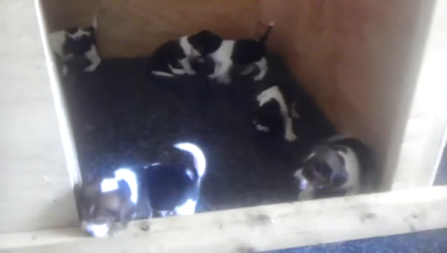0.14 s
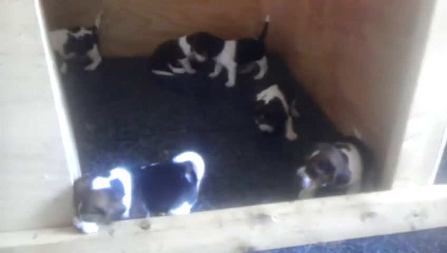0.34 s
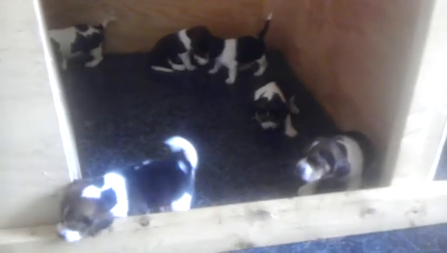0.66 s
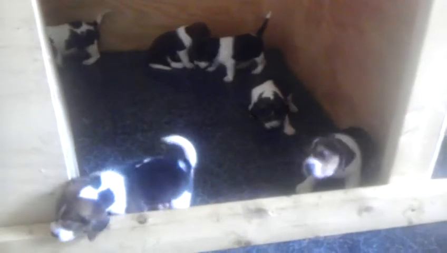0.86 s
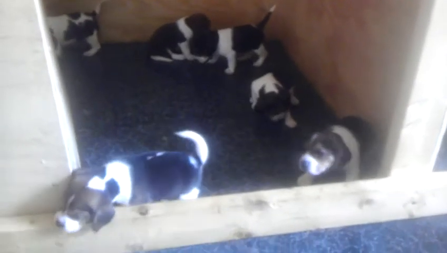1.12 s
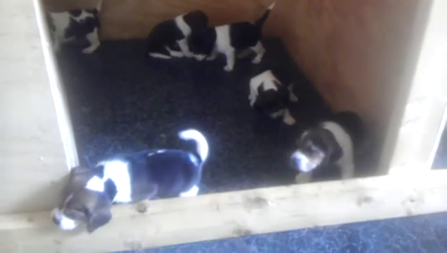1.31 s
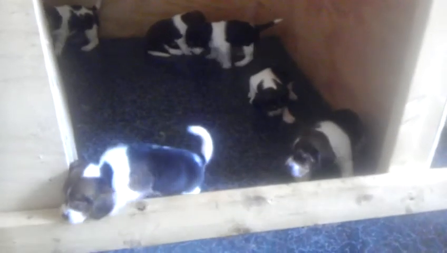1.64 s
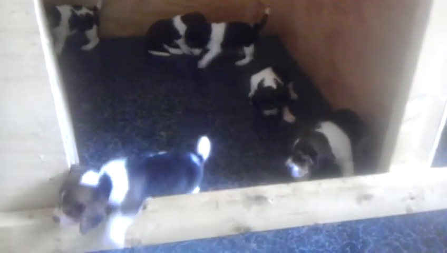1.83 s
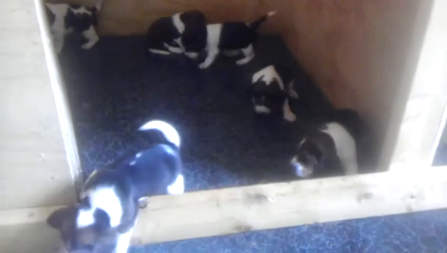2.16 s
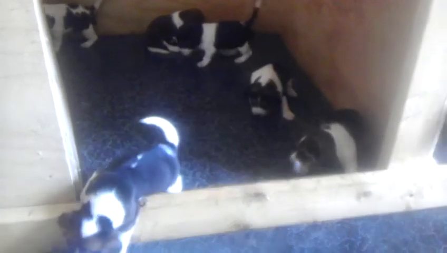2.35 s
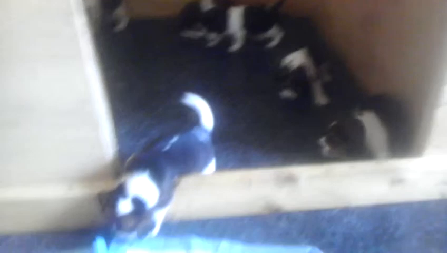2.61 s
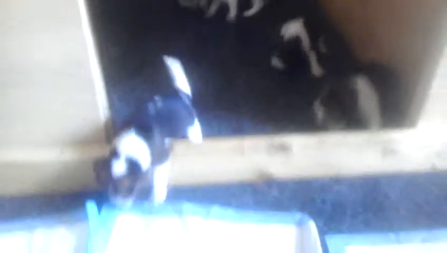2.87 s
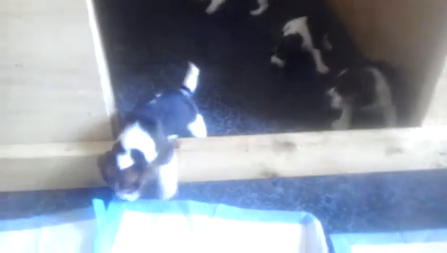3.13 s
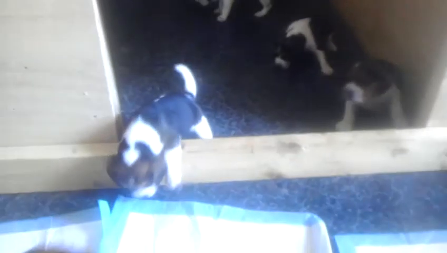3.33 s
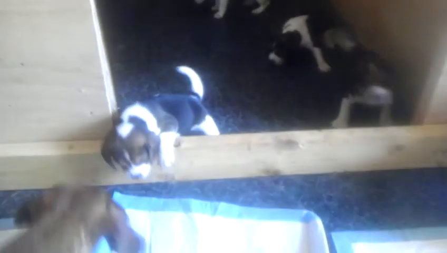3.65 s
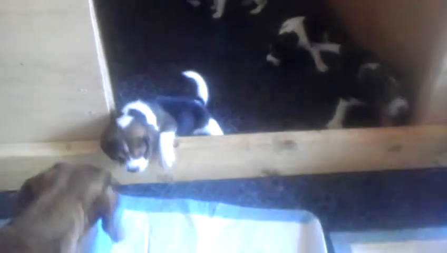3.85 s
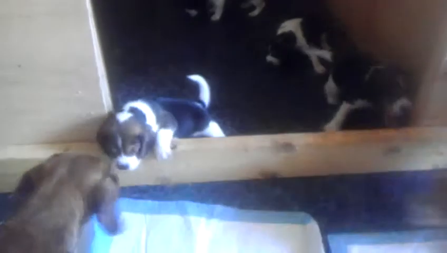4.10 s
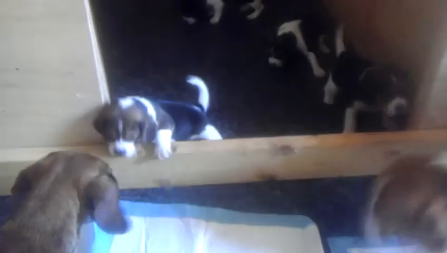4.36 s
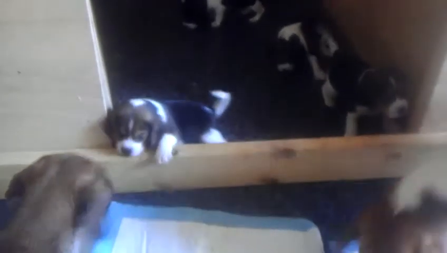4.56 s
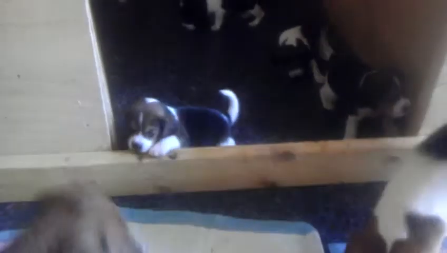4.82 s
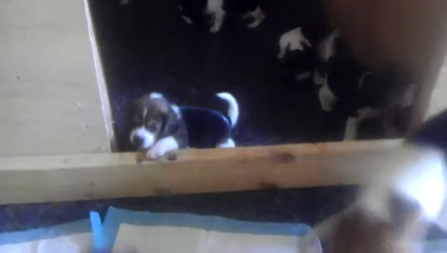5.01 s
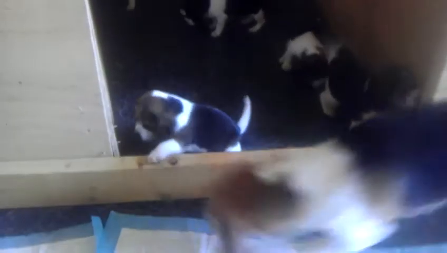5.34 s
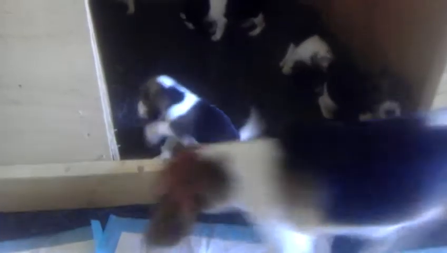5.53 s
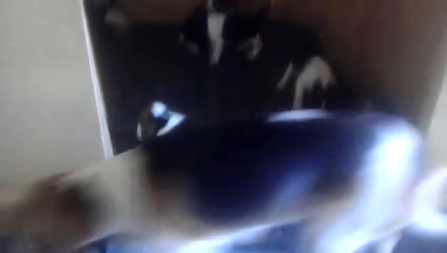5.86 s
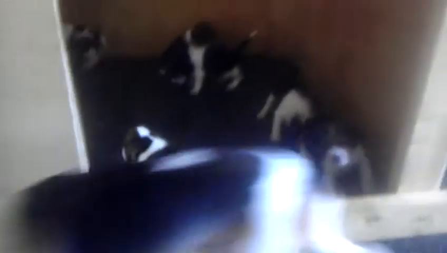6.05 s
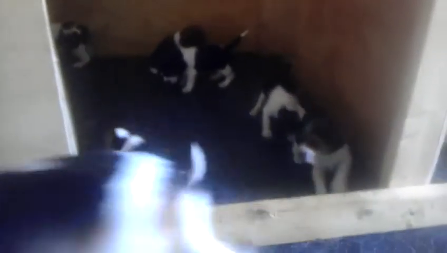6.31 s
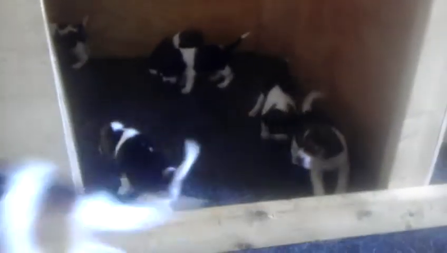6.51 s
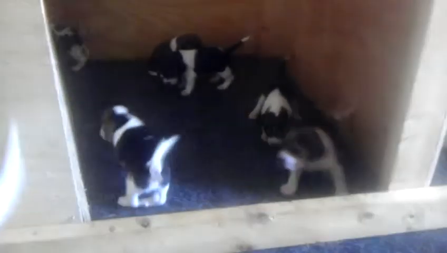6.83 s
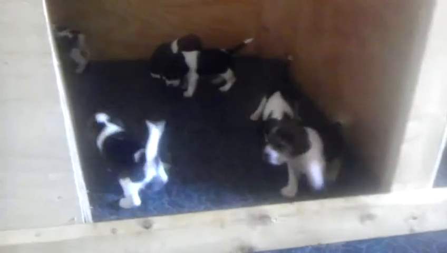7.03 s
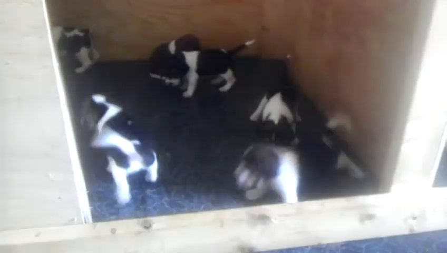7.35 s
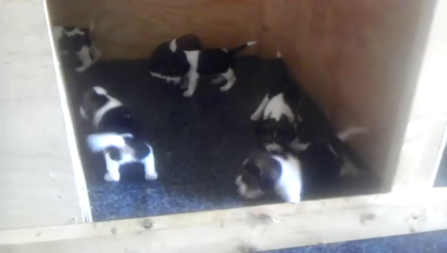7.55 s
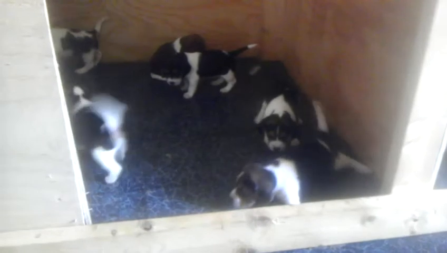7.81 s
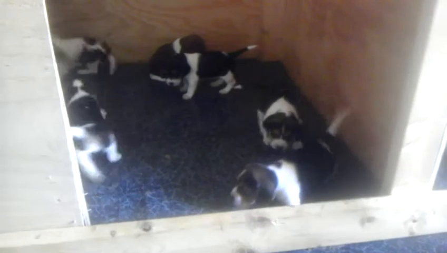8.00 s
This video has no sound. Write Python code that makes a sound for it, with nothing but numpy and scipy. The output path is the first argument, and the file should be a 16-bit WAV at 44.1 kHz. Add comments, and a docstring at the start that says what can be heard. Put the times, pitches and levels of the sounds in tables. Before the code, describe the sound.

Close indoor pickup with thin bass and light hiss: clear, brief puppy whimpers come first, over shuffling feet and dry claw ticks on boards. After a short snort of air comes a quieter gap with a very faint high whistle, then woody paw thuds, crisp clicks and rustling as dogs move about. A rough stick-slip scrape with a low hum cuts in last. The room adds a short boxy ring.

```python
"""Plywood pen in a small room: puppies whine and grunt, paws thump the boards, claws click and scratch. Whines
are gliding partials, grunts a fundamental with two overtones plus puffed noise, a grown dog's whistle a
jittered sine. Paws ring decaying board modes; claws, scuffs, brushes, shuffles and the dog's snort are shaped
noise. At the end a board scrapes harshly: stick-slip noise through resonances. A faint hiss lies underneath."""
import sys
import numpy as np
from scipy import signal
from scipy.fft import rfft, irfft, next_fast_len
from scipy.io import wavfile
from scipy.ndimage import map_coordinates

SR = 44100
rng = np.random.default_rng(int(sys.argv[2]) if len(sys.argv) > 2 else 0)


def waveform_to_disk(signal):
    """Save audio, clipped to [-1, 1], as 16-bit WAV at the path in sys.argv[1]."""
    frames = np.transpose(np.atleast_2d(signal))
    scaled = np.clip(frames, -1, 1) * 32767
    samples = np.round(scaled).astype(np.int16)
    wavfile.write(sys.argv[1], SR, samples)


N = 360297  # samples

# puppy whines: start_s, length_s, start_pitch_hz, held_pitch_hz, end_pitch_hz, hold_place_0_1,
# linger_exponent, fundamental_gain_db, peak_place_0_1, swell_db, fade_db, octave_gain_db, octave_swell_db,
# nasal_ring_gain_db, shrillness_db, roughness_0_1, left_minus_right_db
WHINES = [ (0.0, 0.17, 1118, 1037, 980, 0.6, 3.04, -27, 0.89, 11.4, 0.78, -38, 15, -28, -3.5, 0.048, 1),
          (0.33, 0.18, 989.7, 960, 954, 0.65, 5.6, -26.5, 0.77, 12.7, 4.3, -34, 15.5, -40.5, 3.5, 0.13, -1.5),
          (0.68, 0.039, 938, 935, 926, 0.44, 1.8, -31, 0.83, 14, 1, -36.5, -15, -46.5, 6, 0.32, -2),
          (0.868, 0.038, 923, 934, 930.4, 0.38, 2, -28, 0.96, 21, 1, -36, -16, -46, 9.5, 0.08, 1),
          (1.455, 0.031, 730, 808, 740, 0.63, 1.7, -23.5, 0.82, 23, 2, -45, -7, -58.5, -5, 0.53, -3),
          (1.709, 0.059, 743, 805.5, 800, 0.65, 2.1, -20.5, 0.98, 4.3, 3.3, -41.5, 9, -50.5, -15, 0.26, -4.5),
          (1.923, 0.11, 769, 961.5, 886, 0.57, 2.07, -25, 0.13, 7.7, 6.4, -38, 6.5, -44.5, -15, 0.24, -2.5),
          (2.19, 0.11, 783.5, 959, 835, 0.65, 4.73, -23, 0.083, 4.2, 1.3, -38, 11, -42, -26, 0.054, -2),
          (2.472, 0.18, 945, 1058, 881, 0.38, 1.24, -22, 0.55, 13, 14, -45, 0, -39.5, -4, 0.02, -1.5),
          (2.824, 0.177, 972, 1001, 1008, 0.39, 1.6, -24.5, 0.4, 13.5, 5.3, -44.5, 6, -46.5, 6, 0.11, 4),
          (3.192, 0.0485, 972, 945, 970, 0.5, 1.6, -38, 0.18, 2, 17, -39, 6, -49, 2, 0.2, -5),
          (3.243, 0.052, 963, 972, 922, 0.55, 2, -32.5, 0.36, 6, 8.1, -36.5, 9, -46.5, 6, 0.25, -7.5),
          (3.449, 0.058, 755.4, 771.4, 815, 0.77, 3.4, -30.5, 0.4, 6.2, 1.6, -35.5, 22, -46.5, 12.5, 0.13, 5.5),
          (3.499, 0.041, 828, 890, 786, 0.41, 2, -29, 0.49, 4.9, 5.8, -44.5, -2, -51, 16, 0.26, -6),
          (3.764, 0.077, 960, 1167, 1180, 0.98, 1.3, -26.5, 0.78, 7, 8.8, -43, -19, -46.5, 10, 0.34, -0.5),
          (4.006, 0.073, 1196, 1348, 1356, 0.97, 2.93, -28.5, 0.41, 6, 6.2, -56.5, -6, -50.5, 15.5, 0.19, 5.5),
          (4.227, 0.1, 991, 1058, 947, 0.53, 3.1, -23.5, 0.92, 6.7, 1.4, -33, 2, -46, 16.5, 0.16, 3),
          (7.474, 0.025, 1160, 1020, 960, 0.6, 1.5, -52, 0.5, 4, 3, -66, -1, -71, 0, 0.3, 0)]
# muzzle colour on the upper partials: frequency_hz, relative_level_db
MUZZLE = [(2300, -12.5), (3200, -14.5), (3900, -13), (4200, 4.5), (4650, 6), (5250, 12), (5900, -3.5),
          (6800, -19.5), (8600, -16), (10500, -28.5), (12200, -23.5), (14000, -61.5)]
# pen standing waves: centre_hz, width_hz, level_db
PEN_WAVES = [(786, 12, 3), (925, 16, -1), (1046, 14, -5)]
# shuffling bouts: start_s, length_s, relative_tread_db, relative_rub_db
SHUFFLES = [(0.0, 0.39, -55, -52.5), (0.355, 0.4, -58.5, -64.5), (0.753, 0.27, -58.5, -66.5),
            (1.112, 0.69, -69, -64), (1.728, 0.52, -62, -73.5), (2.255, 0.55, -62, -61.5),
            (2.821, 0.3, -55, -57), (3.126, 0.54, -59.5, -60), (3.74, 0.2, -57, -55),
            (3.994, 0.45, -55.5, -57), (4.863, 0.51, -73.5, -71.5), (5.348, 0.4, -65, -59.5),
            (5.83, 0.2, -66, -62.5), (6.086, 0.31, -65, -61.5), (6.443, 0.17, -67, -64),
            (6.651, 0.25, -68, -65.5), (6.946, 0.18, -58.5, -57.5), (7.224, 0.22, -62, -53),
            (7.477, 0.41, -52, -54), (7.861, 0.27, -64, -55.5)]
# litter stirring between bouts: time_s, relative_level_db
STIRRING = [(0.0, -62), (3.5, -58), (3.7, -75.5), (8.17, -72)]
# claws dragged over plywood: start_s, length_s, level_db
SCRATCHES = [(0.112, 0.07, -42), (1.153, 0.058, -44), (1.679, 0.034, -35), (2.59, 0.031, -39),
             (2.68, 0.032, -43), (2.97, 0.075, -34), (3.29, 0.037, -41.5), (5.39, 0.3, -57.5),
             (6.158, 0.059, -53), (6.81, 0.043, -52), (7.332, 0.041, -53), (7.765, 0.042, -54),
             (7.905, 0.066, -44.5), (8.014, 0.067, -47.5)]
# paws on the boards: start_s, gain_db, relative_scuff_db
PAWS = [(0.199, -38.5, 12), (0.224, -33, -1.5), (0.868, -33, -1), (1.346, -32.5, -16), (1.496, -39, 1),
        (2.29, -35, 0), (2.415, -36.5, -12), (3.058, -38, 7.5), (3.774, -37, -9), (3.819, -40.5, -20),
        (4.071, -39.5, -18), (4.862, -46, -18), (5.827, -30, -6), (6.282, -38, -12), (6.423, -35.5, -9),
        (6.844, -42.5, -15), (6.94, -38.5, -11), (7.041, -51, -16), (7.269, -32.5, -8), (7.329, -41, -16),
        (7.528, -32.5, -5.5), (7.553, -46, -18), (7.629, -40, -29), (7.675, -34, -4), (7.856, -35.5, -25),
        (7.956, -39, -22), (8.025, -48, -24)]
# board modes: nominal_frequency_hz, relative_level_db, t60_s
BOARDS = [(86.4, -49.5, 0.13), (135.6, -5, 0.13), (167, 1.5, 0.085), (216.2, -1, 0.21), (234.4, -1, 0.15),
          (315.6, -8, 0.22), (413.4, -4, 0.11), (565, -17, 0.11), (718, -16, 0.033), (986, 0.5, 0.023)]
# claw clicks: start_s, gain_db, relative_woody_body_db, relative_tick_db, relative_crack_db
CLAWS = [(0.842, -39, -1, -16, -8), (1.083, -46.5, -16, -7, 10), (1.293, -40, -23, -12, 6.5),
         (1.514, -45, -28, -12, 1), (1.8376, -41, 1, -12, -7), (2.6852, -32.5, -22, -7, 7.5),
         (2.9721, -27.5, -18, -25, 0), (3.1537, -37.5, -20, -7, 7), (3.4416, -32, -20, -10, -1),
         (4.1845, -38, -13, -7, -3), (5.656, -49.5, 0, -24, -4), (5.8072, -45, 5, -22, -4),
         (5.828, -37, -3, -15, -16), (5.838, -35.5, -3.5, -14, -2), (5.9716, -43, -10, -13, 0),
         (6.104, -53, 2, -20, -4), (6.263, -40, -8, -20, -6), (6.274, -32.5, -14, -20, -14),
         (6.4096, -48.5, 5, -25, -7), (6.4213, -30.5, -4.5, -16, 1.5), (6.929, -37.5, -5, -12, -8),
         (7.006, -50, -1, -14, -4), (7.0324, -23.5, -13, -10.5, -6.5), (7.2485, -27, -8, -24, 10),
         (7.2541, -30.5, 7, -3, -6.5), (7.3279, -34, -15, -4, 1), (7.345, -36.5, -8, -18, 0),
         (7.5107, -52, 1, 3, -6), (7.654, -44, -6, -2, 1), (7.977, -47, 1, -11, 0),
         (8.017, -44, -5, -12, -3)]
# closed-mouth grunts: start_s, length_s, mean_pitch_hz, relative_level_db, overtone_step_db, hoarseness_0_1
GRUNTS = [(1.241, 0.03, 378, -42, -15, 0.01), (1.34, 0.021, 330, -38.5, -28, 0.14),
          (1.444, 0.028, 417, -40.5, -17, 0.1), (3.347, 0.056, 408, -43, -2.5, 0.27),
          (7.623, 0.026, 394, -39.5, -19, 0), (7.767, 0.048, 433, -49, 3, 0.04)]
# flank or paw brushing the mat: start_s, length_s, level_db
BRUSHES = [(2.365, 0.082, -44.5), (3.04, 0.035, -41), (3.338, 0.05, -48.5), (4.869, 0.051, -53.5),
           (5.079, 0.078, -52), (5.22, 0.046, -51.5), (6.154, 0.049, -54), (7.754, 0.062, -42.5)]
# grown dog's whistle: time_s, pitch_hz, level_db
WHISTLE = [(5.356, 4190, -71), (5.41, 4150, -65), (5.43, 4080, -58), (5.47, 4100, -54), (5.502, 4163, -54),
           (5.55, 4086, -50.5), (5.58, 4072, -52), (5.605, 4100, -66)]
# scraping board resonances: centre_hz, width_hz, relative_level_db
SCRAPE_BODY = [(390, 180, -18), (905, 97, -10.5), (1240, 470, -20.5), (1640, 185, -10), (1884, 180, -10),
               (2780, 700, -23.5), (6800, 540, -35.5)]
# noise colours, each: frequency_hz, relative_level_db_per_hz
# tread and rub of the feet
TREAD_COLOUR = [(18, -72), (30, -66), (64, -17.5), (156, -5), (211, 2), (261, -3), (339, -6), (402, -3),
                (459, -10), (552, -19), (700, -17.5), (910, -50), (1540, -120)]
RUB_COLOUR = [(290, -45), (500, -10), (689, -12), (886, -7.5), (1150, -6.5), (1240, -8.5), (1310, -10),
              (3060, -7.5), (4920, -16), (6500, -22), (14000, -23)]
# steady hiss
HISS_COLOUR = [(15, -20), (25, -4), (54, -18), (231, 6), (286, -3), (414, 2), (684, -3.5), (991, -5.5),
               (1600, -6), (2860, -5.5), (6330, -19.5), (11600, -9), (14000, -9)]
# dragged claw
SCRATCH_COLOUR = [(200, -14), (900, -29), (1800, 0), (2900, 4.5), (4200, -2), (6000, -9.5), (9000, -17),
                  (14000, -39)]
# paw scuff
SCUFF_COLOUR = [(40, -57), (150, -23), (350, 7.5), (600, 3.5), (1100, 3), (1600, -9), (4000, -75)]
# claw strike: woody body, click, crack, tick
CLAW_BODY = [(50, -57), (220, -1), (600, -15.5), (1100, -9.5), (1600, -4), (2400, 0.5), (4000, -29)]
CLAW_CLICK = [(100, -62), (900, -10), (1800, -4), (2700, 3), (4000, -9.5), (5200, -12.5), (6500, -28),
              (10000, -47)]
CLAW_CRACK = [(60, -62), (500, -43), (1500, -38), (3000, 7), (4200, 6.5), (5200, -3.5), (8000, -50),
              (14000, -53)]
CLAW_TICK = [(300, -64), (3500, 4), (6000, 4), (8300, 3), (11000, -7.5), (14000, -19)]
# air in a grunt
GRUNT_AIR = [(90, -34), (200, -6), (400, 4.5), (650, -2), (950, -6), (1200, -7), (1600, -26), (4000, -52)]
# brushed fibres
BRUSH_COLOUR = [(40, -66), (120, -5), (220, -24.5), (420, -1), (650, -15), (1100, -2), (1500, -9),
                (3200, -9), (6000, -19.5), (14000, -30)]
# snorted air
SNORT_AIR = [(59, -88), (100, -54), (254, -11), (791, -8.5), (859, -3), (1150, -10), (1350, -20),
             (2410, -18.5), (4400, -42), (6790, -59), (7220, -71), (12900, -61), (14000, -65)]
# stereo likeness of noise: frequency_hz, left_right_likeness_0_1
ALIKE = [(60, 0.48), (150, 0.91), (370, 0.8), (910, 0.7), (2250, 0.18), (5560, 0.13), (13800, 0.068)]
# room decay: frequency_hz, t60_s
ROOM = [(150, 0.39), (900, 0.27), (2500, 0.18), (5500, 0.23), (12000, 0.081)]

SNORT_S, SCRAPE_S = 4.575, 8.093


def amp(db):
    """Decibels to gain."""
    return 10 ** (np.asarray(db) / 20)


def unit(x):
    """Scale to rms 1."""
    return x / np.sqrt(np.mean(x ** 2) + 1e-20)


def along(points, hz):
    """(Hz, value) points read on a log axis."""
    f, v = np.transpose(points)
    return np.interp(np.log(hz + 1), np.log(f + 1), v)


def curves(rows, t):
    """Each column after the time, read at the times t."""
    s, *cols = np.transpose(rows)
    return [np.interp(t, s, c) for c in cols]


def seconds(length_s):
    """Sample times from zero."""
    return np.arange(0, length_s, 1 / SR)


def gate(t, edge_s):
    """Soft opening and closing."""
    to_edge_s = np.minimum(t - t[0], t[-1] - t)
    return np.sin(np.pi / 2 * np.clip(to_edge_s / edge_s, 0, 1)) ** 2


def wobble(n, rate_hz):
    """A smooth random curve, rate_hz knots a second."""
    knots = rng.standard_normal(int(n * rate_hz / SR) + 4)
    return map_coordinates(knots, [np.arange(n) * rate_hz / SR])


def add(track, s, x):
    """Mix x into the track at time s."""
    i = max(0, round(s * SR))
    track[..., i:i + x.shape[-1]] += x[..., :max(0, N - i)]


def filtered(x, response):
    """x times a response of frequency."""
    n = x.shape[-1]
    m = next_fast_len(n + SR // 8)
    return irfft(rfft(x, m) * response(np.fft.rfftfreq(m, 1 / SR)), m)[..., :n]


def resonance(f, centre_hz, width_hz, db):
    """Response of one damped mode, peaking at db."""
    damping = 1j * f * width_hz
    return amp(db) * damping / (centre_hz * centre_hz - f * f + damping)


def noise(colour, n):
    """Coloured stereo noise of rms 1, its left-right likeness set by ALIKE."""
    def mid_side(hz):
        turn = np.arccos(np.clip(along(ALIKE, hz), -1, 1)) / 2
        return amp(along(colour, hz)) * [np.cos(turn), np.sin(turn)]

    mid, side = filtered(rng.standard_normal((2, n)), mid_side)
    return unit(np.array([mid + side, mid - side]))


def panned(lean_db):
    """Left and right gains lean_db apart."""
    return amp(np.array([lean_db, -lean_db]).reshape(2, -1) / 2)


def in_room(x, wet_db, first_wall_s=.004):
    """Direct sound plus a fresh decaying tail from pen walls and room; total energy is kept."""
    hz, t, z = signal.stft(noise([(1, 0)], SR // 2), SR, nperseg=256)
    decay = amp(-60 * t / along(ROOM, hz)[:, None])
    tail = signal.istft(z * decay, SR, nperseg=256)[1]
    tail = tail * (np.arange(tail.shape[1]) / SR > first_wall_s)
    response = amp(wet_db) * tail / np.linalg.norm(tail[0])
    response[:, 0] = 1  # direct sound
    heard = signal.fftconvolve(np.atleast_2d(x), response, axes=1)
    return heard * np.linalg.norm(x, axis=-1, keepdims=True) / np.linalg.norm(heard, axis=1, keepdims=True)


def in_pen(x):
    """Whines set the pen's standing waves ringing; these beat against the voice when the pitch moves on."""
    waves = lambda f: 1 + sum(resonance(f, *wave) for wave in PEN_WAVES)
    rung = filtered(np.pad(x, (0, SR // 4)), waves)
    return rung * np.linalg.norm(x) / np.linalg.norm(rung)


def whine_pitch(t, length, start_hz, held_hz, end_hz, hold_at, linger):
    """Fold pitch slides to a held note, then to its end; a falling whine slackens at the last."""
    fall_shape, slack_share, slack_s = 1.9, 0.088, 0.0076
    u, hold_at = t / length, np.clip(hold_at, .02, .98)
    rise = np.sin(np.pi / 2 * np.minimum(u / hold_at, 1)) ** linger
    fall = np.maximum((u - hold_at) / (1 - hold_at), 0) ** fall_shape
    hz = start_hz + (held_hz - start_hz) * rise + (end_hz - held_hz) * fall
    slack = slack_share * (end_hz < held_hz) * np.exp((t - length) / slack_s)
    return hz * (1 - slack)


def whines(jitter=0.041, shimmer_db=6, edge_s=0.0033, attack_s=0.007, shrill_hz=6500, ring_lean_db=4.0):
    """Tight vocal folds give a strong fundamental, its octave and upper partials ringing in the muzzle."""
    end_rough = 0.12  # roughness gained as the air runs out
    octave_open_db, ring_open_db = 5.5, 8  # what the opening mouth adds
    low_waver_db, low_waver_hz, waver_db, waver_hz = 2.2, 55, 3, 48.5  # fundamental, then other partials
    out, k = np.zeros((2, N)), np.arange(1, 18)[:, None]
    for (s, length, start_hz, held_hz, end_hz, hold_at, linger, low_db, peak_at, swell_db, fade_db,
         octave_db, octave_swell_db, ring_db, shrill_db, rough, lean_db) in WHINES:
        t = seconds(length)
        n, u = len(t), t / length
        hz = whine_pitch(t, length, start_hz, held_hz, end_hz, hold_at, linger)
        shut = 1 - np.sin(np.pi * u)
        effort_db = np.interp(u, [0, np.clip(peak_at, 0, 1), 1], [-swell_db, 0, -fade_db])
        effort = amp(effort_db) * (1 - np.exp(-t / attack_s))
        # hoarse folds waver in pitch and strength
        rough = rough + end_rough * u ** 6
        hz = hz * (1 + jitter * rough * wobble(n, 257.0))
        push = gate(t, edge_s) * amp(shimmer_db * rough * wobble(n, 296.3))
        # each partial wavers on its own
        waver = np.array([unit(amp(waver_db * wobble(n, waver_hz))) for _ in k])
        waver[0] = unit(amp(low_waver_db * wobble(n, low_waver_hz)))
        partials = np.sqrt(2) * push * waver * np.sin(2 * np.pi * k * np.cumsum(hz) / SR)
        # shrillness shifts the partials above shrill_hz
        muzzle = amp(along(MUZZLE, k * hz) + shrill_db * (k * hz > shrill_hz)) * (k > 2)
        upper = (muzzle * partials).sum(0) / np.linalg.norm(muzzle, axis=0)
        low = amp(low_db) * in_pen(effort * partials[0]) * panned(lean_db)
        octave = amp(octave_db + octave_swell_db * (u - .5) - octave_open_db * shut) * partials[1]
        ring = amp(ring_db - ring_open_db * shut) * upper * panned(ring_lean_db)
        add(out, s, in_room(low, wet_db=-5))
        add(out, s, in_room(octave, wet_db=-3.0))
        # high partials beam forward and reach fewer walls
        add(out, s, in_room(ring, wet_db=-6))
    return out


def shuffle(tread_db=-1, rub_db=4.5, grain_db=4, clump_db=2, step_db=0.5, edge_s=0.04):
    """Many small feet: dull tread and grainy rub on the mat, in bouts of wavering level."""
    levels = amp(curves(STIRRING, np.arange(N) / SR)[0]) * np.ones((2, 1))
    for s, length, *dbs in SHUFFLES:
        add(levels, s, amp(dbs)[:, None] * gate(seconds(length), edge_s))
    tread, rub = levels * amp(step_db * wobble(N, 13))
    grains = unit(amp(grain_db * wobble(N, 350) + clump_db * wobble(N, 40)))
    rubbing = in_room(amp(rub_db) * rub * grains * noise(RUB_COLOUR, N), wet_db=-3.0)[:, :N]
    return rubbing + amp(tread_db) * tread * noise(TREAD_COLOUR, N)


def hiss(level_db=-60):
    """Steady coloured noise."""
    return amp(level_db) * noise(HISS_COLOUR, N)


def scratches(grain_db=5, edge_s=0.017):
    """A dragged claw catches on the wood's grain in many tiny jerks."""
    out = np.zeros((2, N))
    for s, length, db in SCRATCHES:
        t = seconds(length)
        jerks = unit(amp(grain_db * wobble(len(t), 507.0))) * noise(SCRATCH_COLOUR, len(t))
        add(out, s, in_room(amp(db) * gate(t, edge_s) * jerks, wet_db=2))
    return out


def paws(modes_db=-6, attack_s=0.004, scatter_db=2, detune_share=0.016, scuff_db=-1, scuff_t60_s=0.11):
    """Soft pads scuff the mat and ring the boards' decaying modes, at new strengths for each step."""
    out, t = np.zeros((2, N)), np.arange(SR // 3) / SR
    hz, mode_db, t60_s = np.transpose(BOARDS)[:, :, None]
    for s, db, own_scuff_db in PAWS:
        strength, detune, phase = rng.standard_normal((3, len(hz), 1))
        ringing = np.sin(2 * np.pi * (hz * (1 + detune_share * detune) * t + phase))
        modes = amp(mode_db + scatter_db * strength - 60 * t / t60_s) * ringing
        scuff = amp(own_scuff_db + scuff_db - 60 * t / scuff_t60_s) * noise(SCUFF_COLOUR, len(t))
        step = amp(modes_db) * modes.sum(0) + scuff
        add(out, s, in_room(amp(db) * step * (1 - np.exp(-t / attack_s)), wet_db=-5.0))
    return out


def claws(body_db=3, crack_db=-1.0, crack_t60_s=0.0098, burst_t60_s=0.047, grain_db=3):
    """A strike is a sharp crack plus a fast-dying, scratchy burst: woody body, click and bright tick."""
    out, t = np.zeros((2, N)), np.arange(SR // 5) / SR
    n = len(t)
    for s, db, own_body_db, tick_db, own_crack_db in CLAWS:
        burst = amp(own_body_db + body_db) * noise(CLAW_BODY, n)
        burst = burst + noise(CLAW_CLICK, n)
        burst = burst + amp(tick_db) * noise(CLAW_TICK, n)
        crack = amp(own_crack_db + crack_db - 60 * t / crack_t60_s) * noise(CLAW_CRACK, n)
        skid = amp(-60 * t / burst_t60_s) * unit(amp(grain_db * wobble(n, 430)))
        add(out, s, in_room(amp(db) * crack, wet_db=0.5))
        add(out, s, in_room(amp(db) * skid * burst, wet_db=-0.5))
    return out


def grunts(jitter=0.017, sag_share=0.029, level_db=4, edge_s=0.012):
    """Short sinking notes with the mouth shut; in the hoarse ones air puffs through once a cycle."""
    out = np.zeros((2, N))
    for s, length, mean_hz, db, overtone_db, hoarse in GRUNTS:
        t, hoarse = seconds(length), np.clip(hoarse, 0, 1)
        hz = mean_hz * (1 + sag_share * (.5 - t / length) + jitter * wobble(len(t), 130))
        phase = 2 * np.pi * np.cumsum(hz) / SR
        note = unit(sum(amp(overtone_db * k) * np.sin((k + 1) * phase) for k in range(3)))
        puffs = unit((1 + np.sin(phase)) * noise(GRUNT_AIR, len(t)))
        voice = np.sqrt(1 - hoarse) * note + np.sqrt(hoarse) * puffs
        add(out, s, in_room(amp(db + level_db) * voice * gate(t, edge_s), wet_db=-5.5))
    return out


def brushes(grain_db=3):
    """Fibres rub past in soft grainy swishes that swell and fade."""
    out = np.zeros((2, N))
    for s, length, db in BRUSHES:
        t = seconds(length)
        fibres = unit(amp(grain_db * wobble(len(t), 333))) * noise(BRUSH_COLOUR, len(t))
        add(out, s, in_room(amp(db) * np.hanning(len(t)) * fibres, wet_db=-4.5))
    return out


def snort(blast_db=-30, attack_s=0.0076, hold_s=0.019, t60_s=0.15, flutter_db=3):
    """A grown dog's nostrils leak a little, let go a fluttering blast, and the rest of the air trails out."""
    leak_db, leak_s, trail_db, trail_s = -54, 0.024, -53, 0.13
    out, t = np.zeros((2, N)), np.arange(SR // 5) / SR
    pressure = gate(t, attack_s) * amp(blast_db - 60 * np.maximum(t - hold_s, 0) / t60_s)
    trail = amp(trail_db) * np.clip((trail_s - t) / 0.025, 0, 1)
    flutter = unit(amp(flutter_db * wobble(len(t), 273.0)))
    blast = np.hypot(pressure, trail) * flutter * noise(SNORT_AIR, len(t))
    add(out, SNORT_S, in_room(blast, wet_db=-11))
    leak = gate(seconds(leak_s + attack_s), 0.0079)
    add(out, SNORT_S - leak_s, amp(leak_db) * leak * noise(RUB_COLOUR, len(leak)))
    return out


def whistle(jitter=0.0022, edge_s=0.0073):
    """A grown dog's thin whine through the nose: pitch dips and arches, level swells, then fades."""
    out, t = np.zeros((2, N)), np.arange(WHISTLE[0][0], WHISTLE[-1][0], 1 / SR)
    hz, db = curves(WHISTLE, t)
    tone = np.sin(2 * np.pi * np.cumsum(hz * (1 + jitter * wobble(len(t), 294))) / SR)
    add(out, t[0], in_room(amp(db) * unit(tone) * gate(t, edge_s), wet_db=-13))
    return out


def scrape(slip_centre_hz=135, slip_decay_cycles=1.0, hum_hz=213, hum_db=-5, attack_s=0.019):
    """The board sticks and slips unevenly; slips kick its resonances while its lowest mode hums on."""
    first_db, last_db = -28, -23.0
    out, t = np.zeros((2, N)), seconds(N / SR - SCRAPE_S)
    slip_hz = slip_centre_hz * np.exp(0.28 * wobble(len(t), 120))
    cycle = np.cumsum(slip_hz) / SR % 1
    slips = np.exp(-cycle / slip_decay_cycles) * noise([(1, 0)], len(t))
    # neighbouring modes alternate in sign
    body = lambda f: sum((-1) ** k * resonance(f, *mode) for k, mode in enumerate(SCRAPE_BODY))
    rasp = unit(filtered(slips, body))
    hum = amp(hum_db) * np.sin(2 * np.pi * hum_hz * t)
    push = amp(np.linspace(first_db, last_db, len(t))) * np.minimum(t / attack_s, 1)
    add(out, SCRAPE_S, push * hum)
    add(out, SCRAPE_S, in_room(push * rasp * panned(lean_db=-3.5), wet_db=-6))
    return out


def scene():
    """Voices, feet and the scraping board in the pen, over a faint steady hiss."""
    voices = whines() + grunts() + snort() + whistle()
    feet = shuffle() + scratches() + paws() + claws() + brushes()
    return voices + feet + scrape() + hiss()


def record(dry, low_cut_hz=62, top_hz=14050):
    """The deep bass is cut away, and the small microphone keeps nothing above its band limit."""
    high_pass = signal.butter(4, low_cut_hz, "highpass", fs=SR, output="sos")
    thin = signal.sosfilt(high_pass, dry)
    return filtered(thin, lambda hz: hz < top_hz)


dry = scene()
out = record(dry)
waveform_to_disk(out)
```